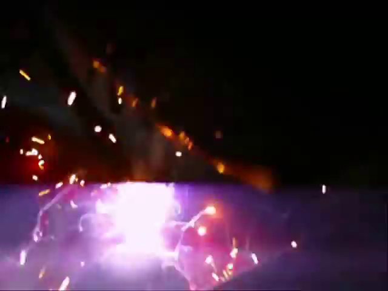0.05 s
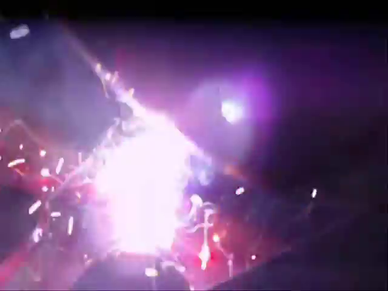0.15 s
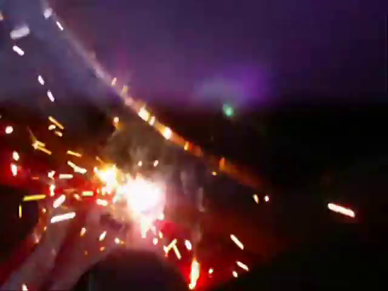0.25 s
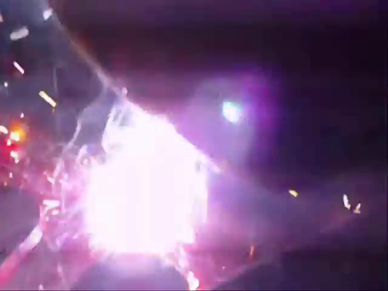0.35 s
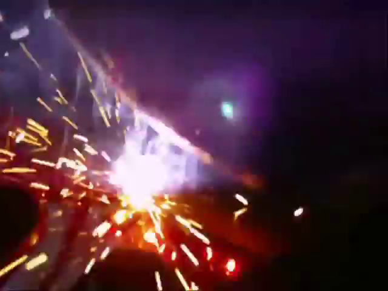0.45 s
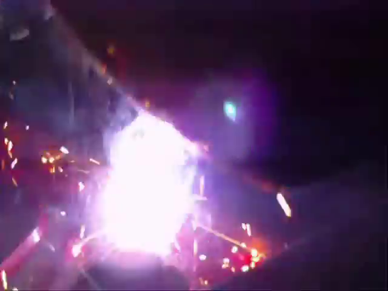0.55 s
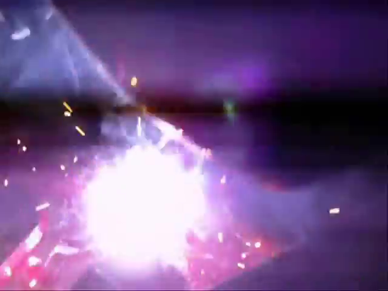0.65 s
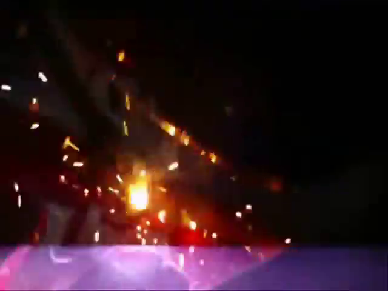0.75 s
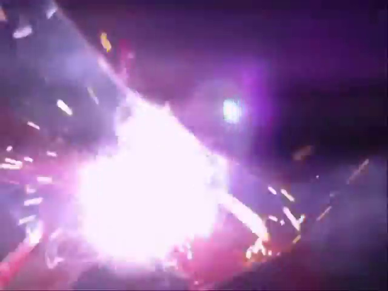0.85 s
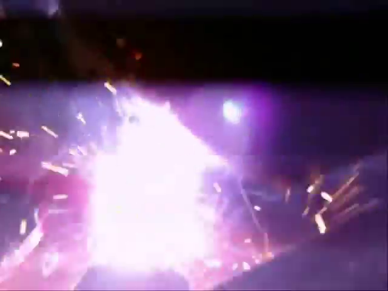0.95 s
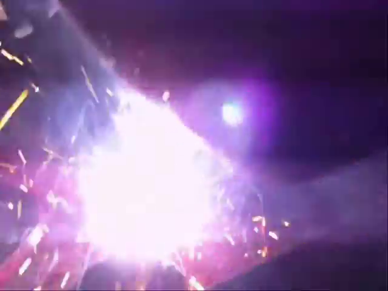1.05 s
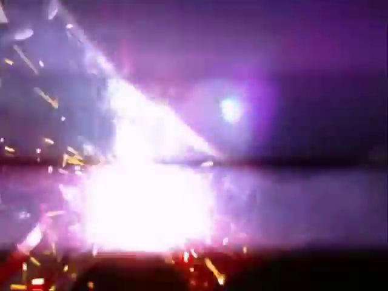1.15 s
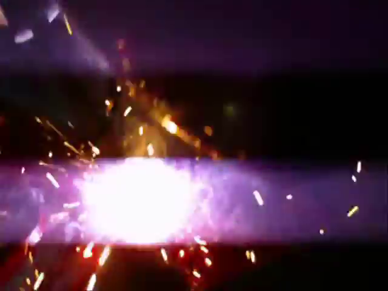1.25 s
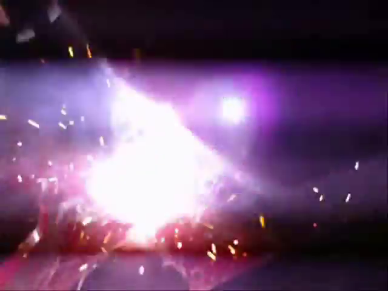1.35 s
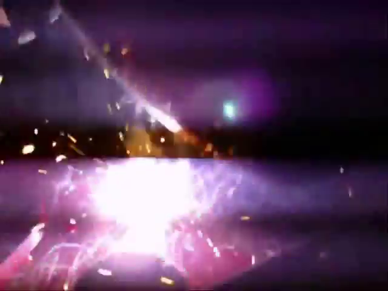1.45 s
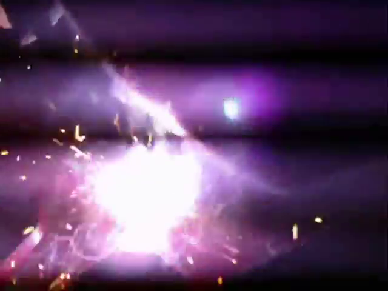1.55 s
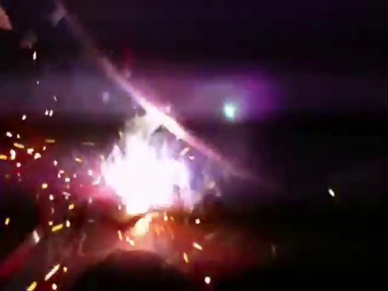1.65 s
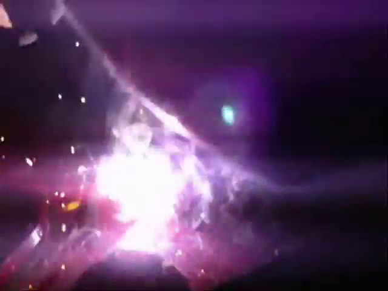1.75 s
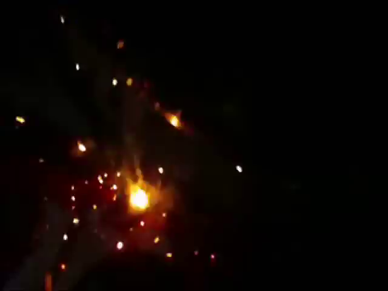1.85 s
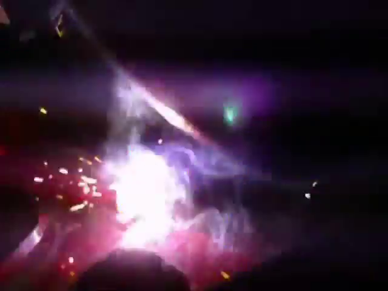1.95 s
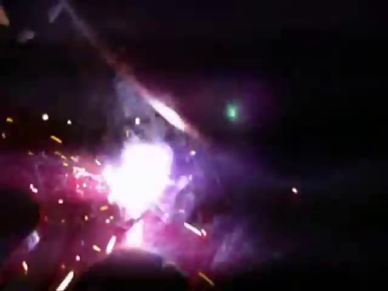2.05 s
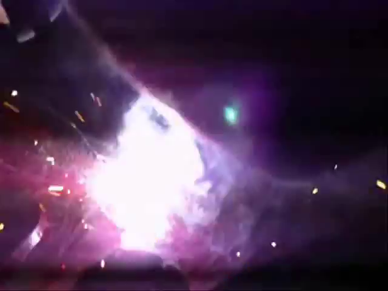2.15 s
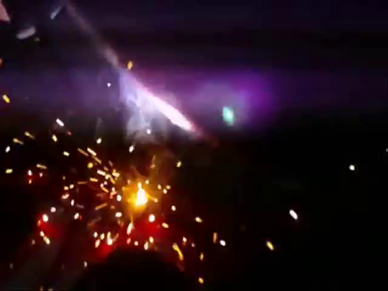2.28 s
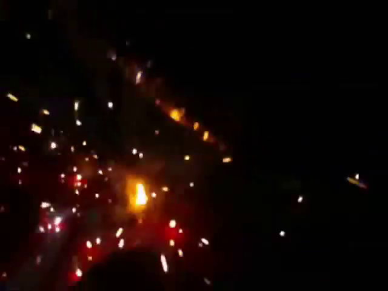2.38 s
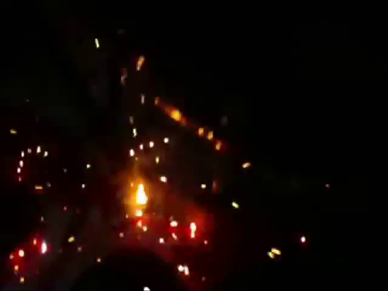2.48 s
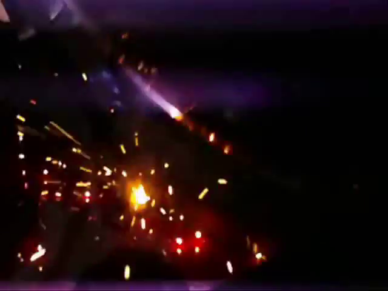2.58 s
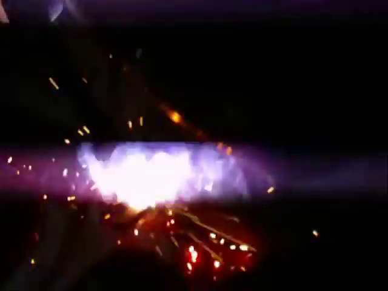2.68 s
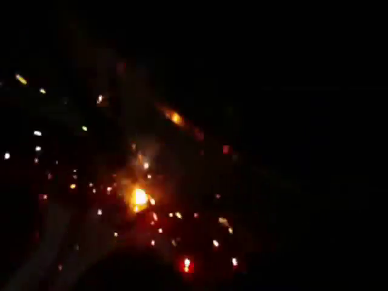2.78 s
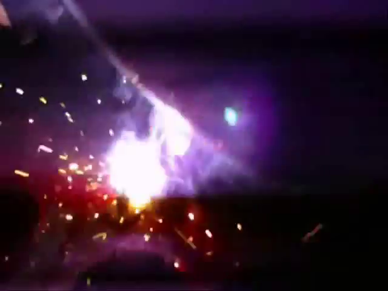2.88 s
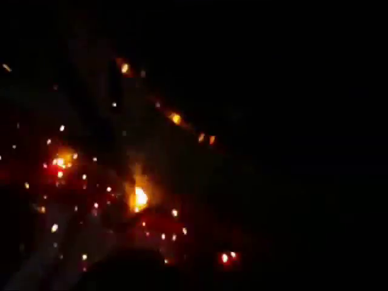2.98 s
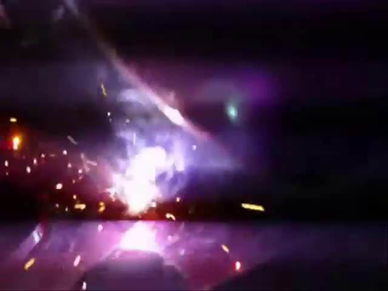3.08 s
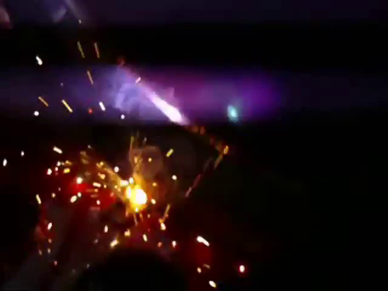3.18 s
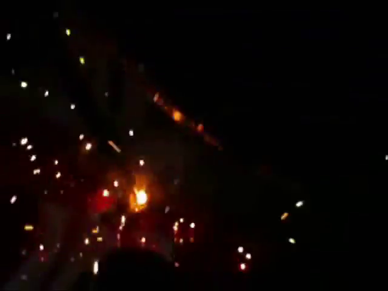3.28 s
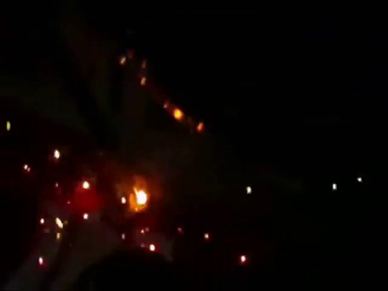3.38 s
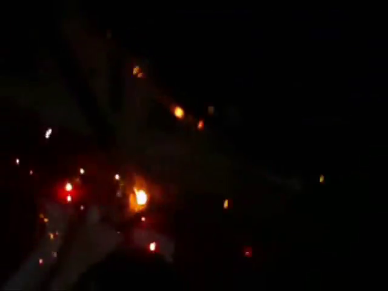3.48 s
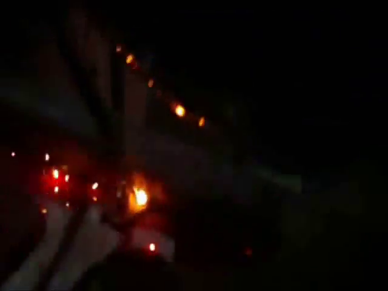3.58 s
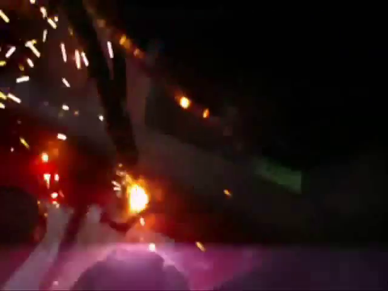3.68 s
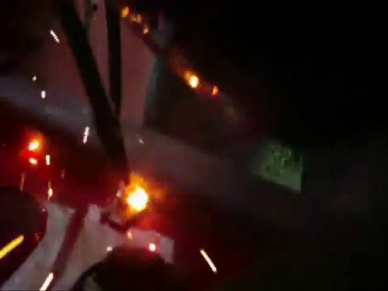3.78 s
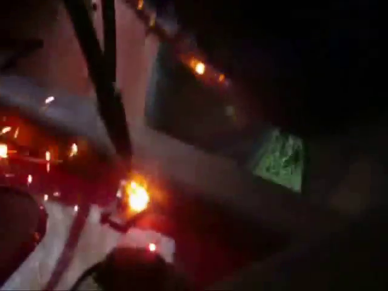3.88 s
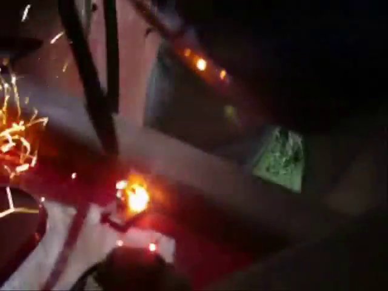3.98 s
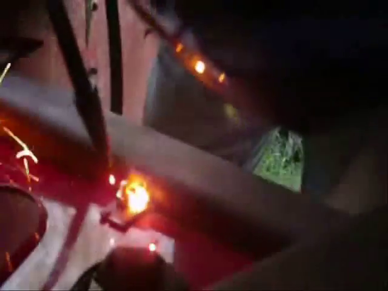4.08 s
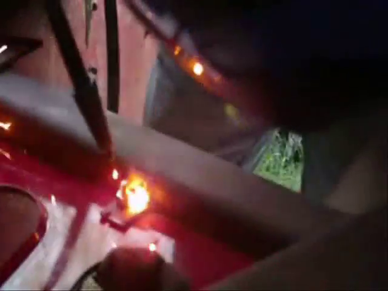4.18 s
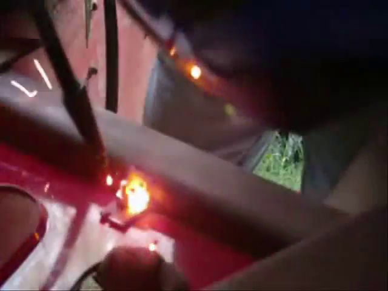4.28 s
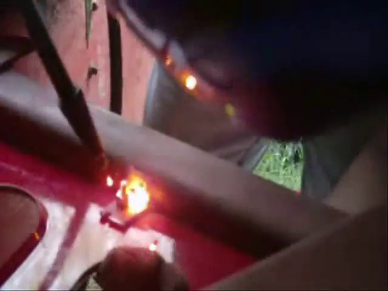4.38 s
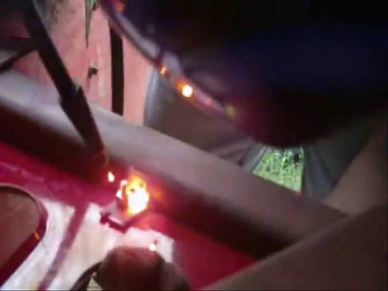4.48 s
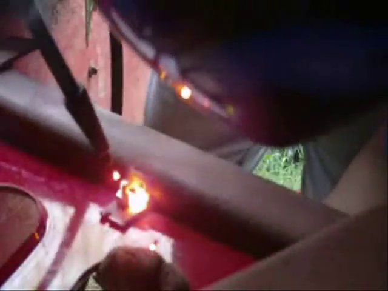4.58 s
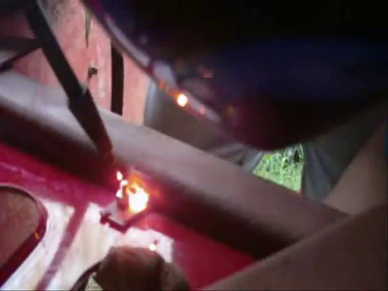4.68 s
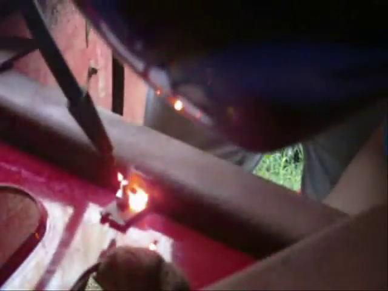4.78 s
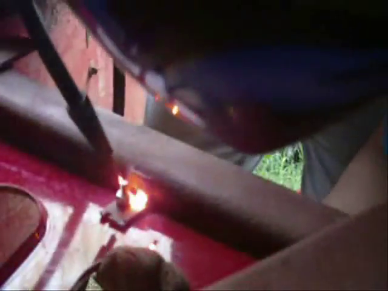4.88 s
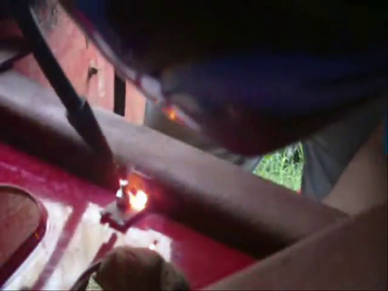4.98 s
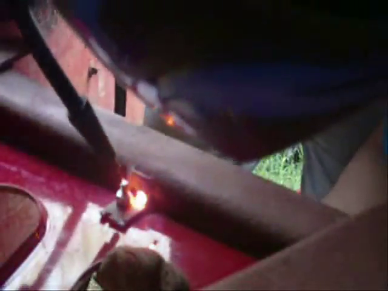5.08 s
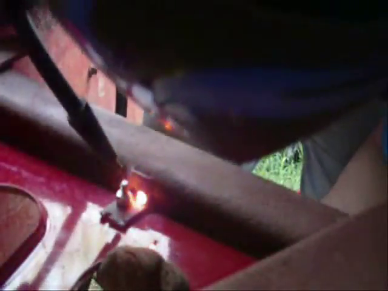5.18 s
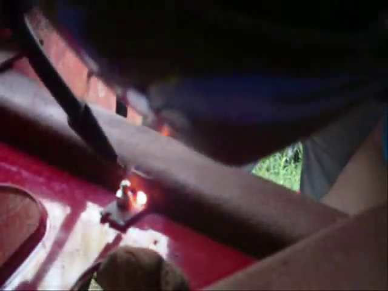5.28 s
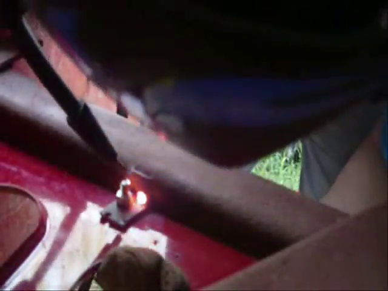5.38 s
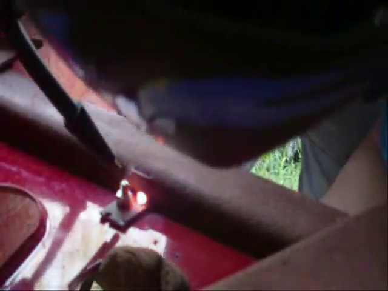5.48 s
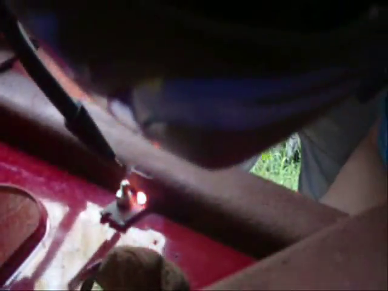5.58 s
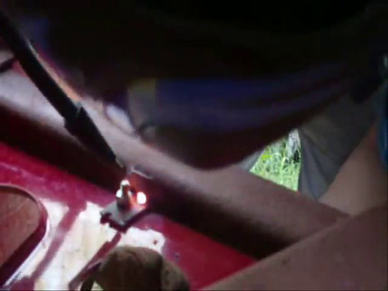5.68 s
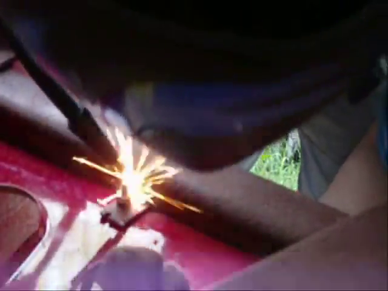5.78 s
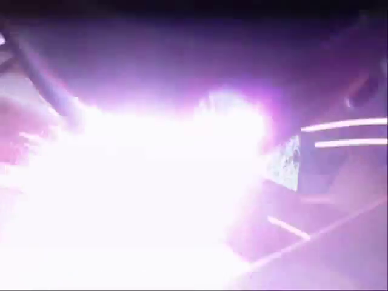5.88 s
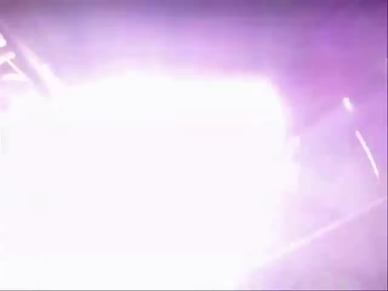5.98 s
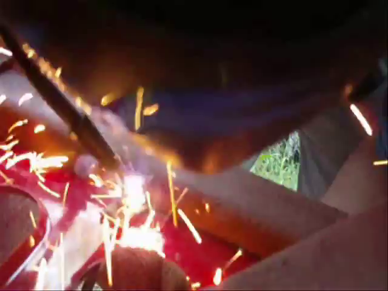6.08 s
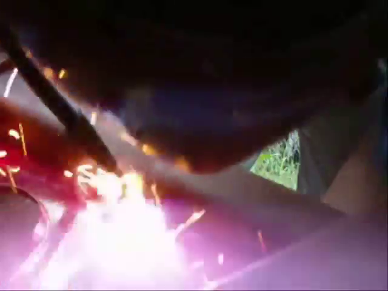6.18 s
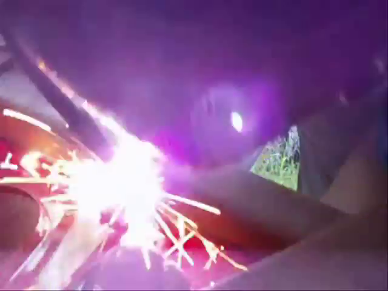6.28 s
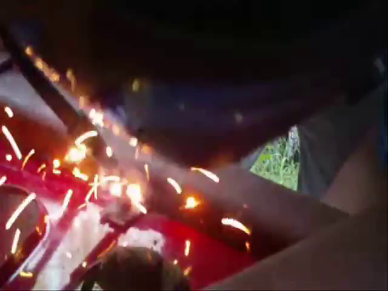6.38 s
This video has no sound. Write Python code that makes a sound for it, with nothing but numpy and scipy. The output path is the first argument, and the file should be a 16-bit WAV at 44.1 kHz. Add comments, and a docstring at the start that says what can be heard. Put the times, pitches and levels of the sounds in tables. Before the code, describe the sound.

Harsh snapping and sputtering of arc welding on steel over a mains buzz, a whooshing break, humming pause, then a tap and fresh crackling burst.

```python
"""A stick-welding arc on a steel frame, close by in an open farm workshop: mains-paced snaps and sparks.
It crackles in spells; drops of metal burst as sharp spikes of spatter, the loudest clipped by the microphone.
Harmonics of twice the mains rate make the current's buzz; faded noise makes flame and flares.
The stuck rod tears free, flares and leaves the steel ringing; a cooling fan's tone runs on through the pause.
The rod taps the work and the arc strikes again. Shaped noise gives the rush of air, low rumble and hiss."""
import sys
import numpy as np
from scipy import signal
from scipy.fft import rfft, irfft
from scipy.io import wavfile
from scipy.ndimage import uniform_filter1d

SR = 44100
rng = np.random.default_rng(int(sys.argv[2]) if len(sys.argv) > 2 else 0)


def waveform_to_disk(signal):
    """Save audio, clipped to [-1, 1], as 16-bit WAV at the path in sys.argv[1]."""
    frames = np.transpose(np.atleast_2d(signal))
    scaled = np.clip(frames, -1, 1) * 32767
    samples = np.round(scaled).astype(np.int16)
    wavfile.write(sys.argv[1], SR, samples)


N = 284445
TIME = np.arange(N) / SR  # seconds

MAINS_HZ = 60.035
RELIGHT_LEAD = .2  # the arc relights this share of a half-cycle early
ROD_STICKS_S, TEAR_FREE_S = 3.4, 3.836  # between these the arc is out and the current growls
FLAME_T60_S = 0.65

# welding current: start_s, level_db, upper_harmonics_db
CURRENT = [(0, 6.5, -4), (.9, 3.5, -14), (1.5, -1.5, -2), (2.4, 2, -1), (3.4, 2.5, -2), (3.6, 2, 7),
           (3.9, 2.5, 2), (3.98, -40, 0), (5.97, -19, -1), (6.02, 3, 3), (6.45, -5, -4)]


def undb(db):
    """Decibels to gain."""
    return 10 ** (np.asarray(db) / 20)


def unit(x):
    """Scale to rms 1."""
    return x / np.sqrt(np.mean(x ** 2))


def curve(rows, column=1):
    """One column of a table, joined by straight lines in time."""
    rows = np.array(rows)
    return np.interp(TIME, rows[:, 0], rows[:, column])


def walk(rate_hz):
    """Smooth random wander with a spread near 1."""
    k = int(SR / rate_hz)
    steps = np.repeat(rng.standard_normal(N // k + 1), k)
    return 1.3 * uniform_filter1d(uniform_filter1d(steps, k), k)[:N]


def low(x, hz, order=2):
    """Low-pass filter."""
    return signal.sosfilt(signal.butter(order, hz, fs=SR, output="sos"), x)


def ring(x, response):
    """Pass a sound through an impulse response."""
    return signal.fftconvolve(x, response)[:N]


def fade(t, t60):
    """Exponential decay that loses 60 dB in t60."""
    return np.exp(-np.log(1000) * t / t60)


def ringing(modes, t):
    """Sum of decaying sines, one per mode: pitch_hz, level_db, t60_s."""
    return sum(undb(db) * fade(t, t60) * np.sin(2 * np.pi * hz * t) for hz, db, t60 in modes)


def resonator(modes, size=4096):
    """Causal unit-energy impulse response with steep-sided resonances: centre_hz, width_hz, level_db."""
    f = np.fft.rfftfreq(size, 1 / SR)
    power = sum(undb(db) ** 2 / (1 + ((f * f - hz * hz) / (f * width + 1)) ** 2) ** 2
                for hz, width, db in modes)
    # folding the cepstrum makes the response minimum-phase
    cepstrum = irfft(np.log(power + 1e-8) / 2)
    cepstrum[1:size // 2] *= 2
    cepstrum[size // 2:] = 0
    response = irfft(np.exp(rfft(cepstrum)))
    return response / np.linalg.norm(response)


def echoes(t60, delay, build):
    """A dense train of fading reflections of unit energy; times in seconds."""
    t = TIME[:SR]
    train = rng.standard_normal(SR) * fade(t, t60) * np.clip((t - delay) / build, 0, 1)
    return train / np.linalg.norm(train)


def spells(t60, column, catch_s=0.0022):
    """Each spell of free burning catches quickly, holds its level and fades; the strongest one counts."""
    # start_s, end_s, crackle_db, flame_db
    free_burning = [(0, 0.177, -25, -27.5), (.35, 0.443, -32.5, -29), (0.488, 0.662, -24, -28),
                    (0.762, 0.889, -22.5, -32), (0.984, 1.184, -22, -32), (1.239, 1.465, -19.5, -26.5),
                    (1.549, 1.776, -20.5, -27), (1.933, 2.013, -24, -27.5), (2.106, 2.272, -33.5, -28.5),
                    (2.362, 2.48, -24.5, -30), (2.51, 2.611, -30.5, -29), (2.743, 2.86, -31, -27.5),
                    (3.013, 3.148, -25.5, -28), (3.27, 3.395, -23, -27.5), (3.847, 3.915, -46, -29.5),
                    (5.992, 6.206, -33.5, -24.5), (6.285, 6.45, -37, -27)]
    levels = []
    for row in free_burning:
        rise = np.clip((TIME - row[0]) / catch_s, 0, 1)
        fall = fade(np.maximum(TIME - row[1], 0), t60)
        levels.append(undb(row[column]) * rise * fall)
    return np.max(levels, axis=0)


def burning():
    """1 in full arc, falling with a weak current, 0 while the rod sticks."""
    stuck = (TIME > ROD_STICKS_S) & (TIME < TEAR_FREE_S)
    return np.minimum(2 * undb(curve(CURRENT)), 1) * ~stuck


def crackle(t60=0.029, simmer_db=-44.5):
    """Strength of the crackle: it follows the spells and simmers between them."""
    return np.maximum(spells(t60, column=2), undb(simmer_db) * burning())


def relights(jitter_s=.0009):
    """The sample at which the arc relights on each half-cycle of the mains."""
    cycles = np.arange(1, int(2 * MAINS_HZ * N / SR))
    when = (cycles - RELIGHT_LEAD) / (2 * MAINS_HZ) + jitter_s * rng.standard_normal(len(cycles))
    return np.clip(when * SR, 0, N - 1).astype(int)


def sizzle(strength, snap_db=-3, snap_spread_db=6, fizz_db=-7, sparks_per_s=900, spread_db=5, pulsing=0.13):
    """The arc relights with a small snap on each half-cycle of the mains, and fine sparks swell in step."""
    at = relights()
    snaps = np.zeros(N)
    snaps[at] = -undb(snap_spread_db * np.minimum(rng.standard_normal(len(at)), 1.5))
    sparks = (rng.random(N) < sparks_per_s / SR) * rng.standard_normal(N)
    sparks = sparks * undb(spread_db * np.minimum(rng.exponential(size=N), 2))
    swell = 1 + pulsing * np.cos(2 * np.pi * (2 * MAINS_HZ * TIME + RELIGHT_LEAD))
    return (undb(snap_db) * unit(snaps) + undb(fizz_db) * unit(swell * sparks)) * strength


def small_drops(strength, drops_per_half_cycle=.55, over_crackle_db=3, spread_db=4,
                knock_db=4.5, knock_spread_db=2):
    """Metal melts unevenly and lets go a drop per unit melted; rows start_s, level_db, knock_db."""
    at = relights()
    melt, size, knock = rng.uniform(-1, 1, (len(at), 3)).T
    melted = np.cumsum(drops_per_half_cycle * (1 + melt))
    sheds = np.diff(np.floor(melted), prepend=0) > 0
    # sqrt(3) turns a uniform draw into a spread of 1
    db = 20 * np.log10(strength[at] + 1e-9) + over_crackle_db + np.sqrt(3) * spread_db * size
    knocks_db = knock_db + np.sqrt(3) * knock_spread_db * knock
    return np.column_stack([at / SR, db, knocks_db])[sheds]


def pops(drops, pop_db=21, spray_db=-10, trail_db=-11, knock_hz=1000, knock_octaves=1.47,
         glance_db=-7, glance_s=.0025):
    """A drop bursts in a spike that glances off the steel, with spatter and its own share of low-middle knock."""
    t = TIME[:SR // 4]
    # tearing apart, spray, trail: energy_db, t60_s
    stages = [(-7, 0.013), (spray_db, 0.12), (trail_db, 0.15)]
    spatter = np.sqrt(sum(undb(db) ** 2 * fade(t, t60) ** 2 / np.sum(fade(t, t60) ** 2)
                          for db, t60 in stages))
    crack, knock = np.zeros((2, N + len(t)))
    for s, db, knock_db in drops:
        burst = spatter * rng.standard_normal(len(t))
        burst[0] = 1
        # glance: a path of its own for each drop
        burst[1 + int(rng.random() * glance_s * SR)] += undb(glance_db)
        i = int(np.clip(s * SR, 0, N - 1))
        crack[i:i + len(t)] += undb(db) * burst
        knock[i:i + len(t)] += undb(db) * (undb(knock_db) - 1) * burst
    edges_hz = knock_hz * 2 ** (np.array([-.5, .5]) * knock_octaves)
    middle = signal.sosfilt(signal.butter(1, edges_hz, "bandpass", fs=SR, output="sos"), knock)
    return -undb(pop_db) * (crack + middle)[:N]


def scatter(x, lag_s, feedback):
    """An all-pass: reflections within centimetres smear a spike over milliseconds without colouring it."""
    delay = np.exp(-2j * np.pi * np.fft.rfftfreq(2 * N, 1 / SR) * lag_s)
    return irfft(rfft(x, 2 * N) * (feedback + delay) / (1 + feedback * delay))[:N]


def arc():
    """Sizzle and bursting drops, heard through resonances and smeared by close reflections."""
    # big drops bursting: start_s, level_db, low_middle_knock_db
    big_drops = [(0.0152, -7, 2), (0.0546, -7, -4), (0.0661, -12.5, 7), (.115, -6, -2.5), (0.132, -11.5, 3),
                 (0.1568, -13.5, 5), (0.2647, -4.5, 0.5), (0.349, -10, 2), (0.4211, -8, 1.5),
                 (.429, -6.5, -2), (.5055, -11, -4), (0.5563, -9, -4), (.5734, -17, 6), (.606, -9, -8),
                 (.6232, -12.5, -1), (0.6309, -5, -3), (0.728, -10, 1.5), (0.7983, -9.5, 1),
                 (.872, -5.5, 0), (.972, -.5, -5), (1.0137, -6, 5.5), (1.057, -7.5, -3), (1.0792, -8, 3.5),
                 (1.1215, -8, -4), (1.1402, -13, 7.5), (1.1638, -5.5, 3), (1.1797, -11, 3.5),
                 (1.2403, -14.5, 4), (1.2633, -8, -2), (1.2968, -9.5, 0), (1.3457, -9, 7), (1.3643, -12, 6),
                 (1.379, -6.5, 0), (1.389, -9, 7), (1.4408, -7.5, 4.5), (1.4641, -15.5, 3), (1.497, -3, -5),
                 (1.5122, -7.5, 5), (1.5543, -14.5, 4), (1.574, -14, 3), (1.6301, -16.5, 9.5),
                 (1.6643, -13.5, 5.5), (1.689, -4.5, 1), (1.748, -10, 1), (1.7617, -9, 0),
                 (1.7872, -11, -3), (1.823, -10, -8), (1.8305, -6, 2.5), (1.8951, -5.5, -1.5),
                 (1.9143, -4.5, -4), (2.0054, -13.5, -3), (2.114, -10, -0.5), (2.1327, -13.5, 2),
                 (2.195, -15.5, 4), (2.2406, -11, 8.5), (2.3451, -9, 2), (2.4042, -8, 2.5),
                 (2.4215, -9, -3), (2.455, -9, -10), (2.5309, -8.5, 0), (2.5454, -8.5, 7),
                 (2.6396, -7.5, 4.5), (2.7541, -8, 1.5), (2.7873, -13.5, 2), (2.8112, -9, 3),
                 (2.8464, -7, 1), (2.8707, -8, -3), (2.897, -14.5, 2), (2.9442, -11.5, 9.5),
                 (3.0222, -11, 5.5), (3.0477, -12, 4.5), (3.107, -19, 0), (3.2423, -13.5, 2),
                 (3.306, -14.5, 3), (3.3304, -11, 4.5), (3.362, -12, 1.5), (3.3894, -10.5, 4),
                 (3.8361, -12, -4), (3.9083, -19.5, 0), (3.917, -22.5, 10), (6.0105, -22, 2),
                 (6.021, -2.5, -1), (6.087, -10.5, 6.5), (6.1029, -13, 4), (6.135, -25, 16),
                 (6.1707, -10.5, 8), (6.1797, -4.5, -1), (6.3036, -13, 14), (6.407, -13.5, 5.5)]
    # resonances: centre_hz, width_hz, level_db
    body = [(269, 135, -6), (417, 174, -5.5), (716, 134, -3), (1053, 342, -0.5), (1361, 240, -3),
            (1830, 84, -10), (2143, 120, -11.5), (2747, 800, -6), (3210, 126, -4), (3520, 1000, -19),
            (4614, 1000, -15.5), (5245, 720, -11.5), (5870, 840, -11), (6630, 980, -11), (7120, 490, -11.5),
            (7870, 175, -13.5), (8330, 190, -10.5), (8855, 650, -14), (10390, 120, -19.5),
            (11700, 370, -78)]
    strength = crackle()
    spits = pops(small_drops(strength), pop_db=21.5, spray_db=-12, trail_db=-14)
    sound = ring(sizzle(strength) + spits + pops(big_drops), resonator(body))
    sound = scatter(sound, lag_s=.00027, feedback=.85)
    return scatter(sound, lag_s=0.000442, feedback=0.63)


def workshop(x, near_db=-13, room_db=-14, boom_db=-1, boom_hz=450):
    """Quick reflections off the steel nearby, then the room, with a strong low boom."""
    near = echoes(t60=0.019, delay=0.001, build=0.0024)
    room = echoes(t60=.24, delay=0.0067, build=0.0017)
    boom = low(echoes(t60=0.14, delay=0.0011, build=0.0042), boom_hz)
    return x + ring(x, undb(near_db) * near + undb(room_db) * room + undb(boom_db) * boom)


def roar():
    """The soft, low noise of burning gas, swelling with each spell of the arc."""
    # centre_hz, width_hz, level_db
    modes = [(220, 109, 5), (420, 50, -9.0), (770, 1400, -12.0)]
    return ring(rng.standard_normal(N), resonator(modes)) * spells(FLAME_T60_S, column=3)


def rumble(level_db=-24, edge_hz=90):
    """A faint low rumble, unrelated left and right, that swells with each spell."""
    return undb(level_db) * unit(low(rng.standard_normal((2, N)), edge_hz)) * spells(FLAME_T60_S, column=3)


def buzz(waver_db=3.5, waver_rad=0.2, idle_db=-45):
    """The current shakes transformer and steel at multiples of twice the mains rate; a faint hum stays at idle."""
    # successive multiples of twice the mains rate, before the current's level: rms_db
    harmonics = [-36, -40.5, -65, -45, -54.5, -40, -62, -60, -61.5]
    phase = 2 * np.pi * MAINS_HZ * TIME
    loaded = 0
    for k, db in enumerate(harmonics, 1):
        upper = min((k - 1) / 3, 1)  # growl and waver grow up to the fourth multiple
        drift = rng.uniform(0, 2 * np.pi) + k * waver_rad * walk(10)
        growl_db = upper * curve(CURRENT, column=2)
        level_db = db + growl_db + waver_db * (1 + upper) / 2 * walk(12)
        loaded = loaded + undb(level_db) * np.sin(2 * k * phase + drift)
    idle = undb(idle_db + walk(3.6)) * (np.sin(phase) + np.sin(2 * phase))
    return np.sqrt(2) * (loaded * undb(curve(CURRENT)) + idle)


def fan(flutter_db=2, wobble_hz=1.37, third_db=-17):
    """Blade tone and faint third harmonic, fluttering in its own draught, slower while the arc loads the supply."""
    # start_s, blade_tone_hz, level_db
    speed = [(0, 254.4, -33), (2, 257.6, -33), (3.8, 254.7, -35), (4.1, 255.7, -38.5), (4.5, 265.2, -34.5),
             (4.9, 265, -31), (5.4, 264, -30.5), (5.9, 263.5, -31.5), (6.45, 259.3, -34)]
    phase = 2 * np.pi * np.cumsum(curve(speed) + wobble_hz * walk(13)) / SR
    tone = np.sin(phase) + undb(third_db) * np.sin(3 * phase)
    return np.sqrt(2) * undb(curve(speed, column=2) + flutter_db * walk(11)) * tone


def air(flicker_db=1):
    """A dull, slightly restless rush of air: noise with a shaped spectrum."""
    # relative spectrum: pitch_hz, level_db_per_hz
    spectrum = [(15, -30), (27, -6.5), (60, -18), (88, -12), (165, -9.5), (270, -15.5), (340, -12.5),
                (420, -12.5), (510, -12.5), (620, -20.5), (820, -17), (1050, -25), (1500, -34.5),
                (2600, -40.5), (4200, -49), (8000, -50.5), (13000, -68)]
    # start_s, level_db
    loudness = [(0, -29.5), (3.3, -30.5), (3.7, -32.5), (4.1, -29), (4.5, -33), (5.2, -30), (5.8, -30.5),
                (6.45, -29)]
    hz, db = np.transpose(spectrum)
    f = np.fft.rfftfreq(N, 1 / SR)
    gain = undb(np.interp(np.log(f + 1), np.log(hz), db))
    rush = irfft(rfft(rng.standard_normal(N)) * gain, N)
    return unit(rush) * undb(curve(loudness) + flicker_db * walk(11))


def hiss(level_db=-53, low_hz=2500, high_hz=11500):
    """The faint hiss of the two microphones, unrelated left and right."""
    high_pass = signal.butter(2, low_hz, "highpass", fs=SR, output="sos")
    noise = signal.sosfilt(high_pass, rng.standard_normal((2, N)))
    return undb(level_db) * unit(low(noise, high_hz, order=6))


def flares(whoosh_hz=260, whoosh_db=-3):
    """Puffs of hot gas as the arc breaks or catches: a hollow knock over a low whoosh, from resonant noise."""
    # start_s, level_db, rise_s, t60_s, centre_hz, width_hz
    puffs = [(3.83, -4, 0.0049, 0.075, 700, 503), (3.846, -14, 0.0042, 0.24, 1000, 695),
             (6.004, -13.5, 0.0035, 0.12, 826, 400), (6.173, -5.5, .002, 0.094, 680, 460)]
    out = np.zeros(N)
    for s, db, rise, t60, hz, width in puffs:
        gas = ring(rng.standard_normal(N), resonator([(hz, width, 0), (whoosh_hz, width / 2, whoosh_db)]))
        t = np.maximum(TIME - s, 0)
        out += undb(db) * gas * fade(t, t60) * np.minimum(t / rise, 1)
    return out


def clank():
    """The stuck rod tears free of the work and leaves the steel's modes ringing briefly."""
    # pitch_hz, level_db, t60_s
    steel = [(490, -31, 0.13), (720, -17, 0.35), (860, -29, 0.086), (1044, -15, 0.36), (1385, -18.5, .2),
             (1530, -21, 0.12), (2832, -23, 0.11), (3400, -27, 0.11)]
    return ringing(steel, np.maximum(TIME - TEAR_FREE_S, 0))


def tap(start_s=5.9845, contact_s=0.0027):
    """The flux-coated rod lands softly on the steel with a hollow knock of its modes."""
    # pitch_hz, level_db, t60_s
    rod = [(868, -7, 0.072), (935, -17, .06), (260, -18, .09)]
    t = np.maximum(TIME - start_s, 0)
    return np.minimum(t / contact_s, 1) * ringing(rod, t)


def scene():
    """The arc in its workshop over the machine's hum, centred, with wide rumble and hiss."""
    around = roar() + rumble() + buzz() + fan() + air() + hiss() + flares() + clank() + tap()
    return workshop(arc()) + around


def record(dry, dull_hz=12000, top_hz=15900):
    """The microphone clips the loudest pops and the recorder dulls and cuts the top."""
    clipped = dry / (1 + np.abs(dry) ** 16) ** (1 / 16)
    dulled = low(clipped, dull_hz, order=3)
    return signal.sosfilt(signal.ellip(8, .2, 70, top_hz, fs=SR, output="sos"), dulled)


dry = scene()
out = record(dry)
waveform_to_disk(out)
```